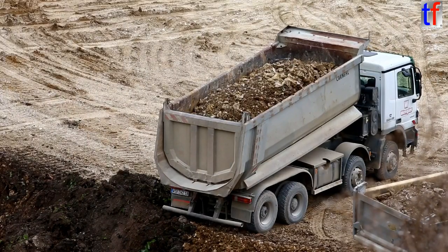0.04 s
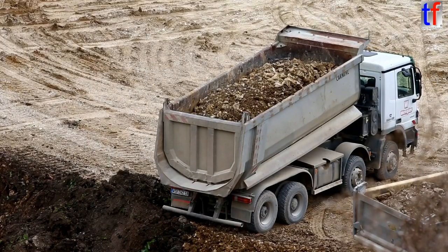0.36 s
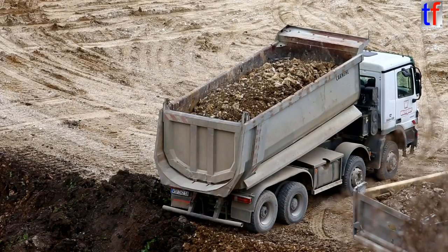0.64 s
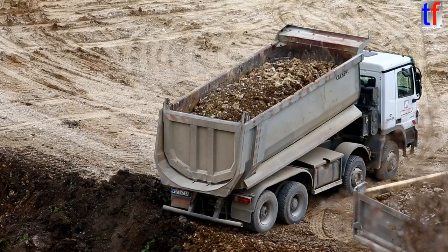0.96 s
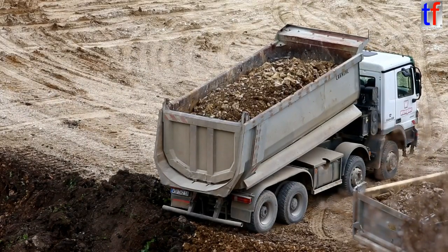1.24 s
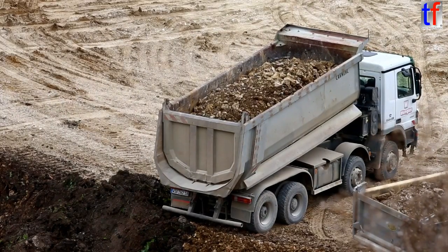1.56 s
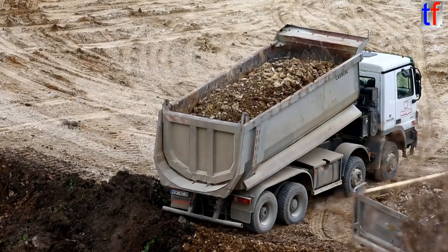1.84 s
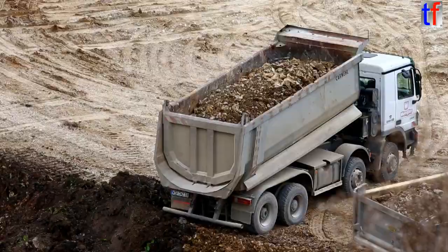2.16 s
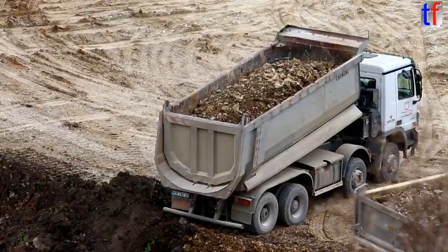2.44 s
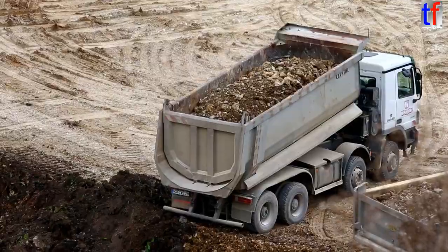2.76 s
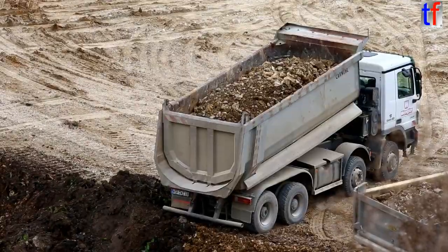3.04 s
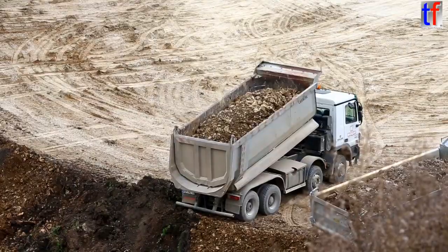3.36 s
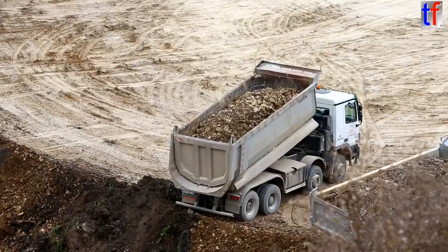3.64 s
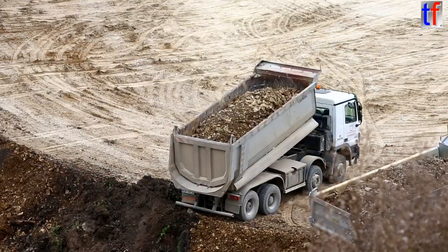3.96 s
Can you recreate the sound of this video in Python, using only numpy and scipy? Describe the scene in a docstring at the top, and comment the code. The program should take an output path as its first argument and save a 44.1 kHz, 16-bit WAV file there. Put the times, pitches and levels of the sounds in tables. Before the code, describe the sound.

A diesel dump truck idles in front of one microphone on a building site, distant machinery behind it. The sound cuts off briefly, then soil and stones scrape and clang loudly over steel, with hissing grit and an engine working underneath.

```python
"""A dump truck's six-cylinder diesel idles in front of one microphone on a building site, its
exhaust throbbing, while a second, slightly faster diesel knocks and machines hum further off.
After an abrupt break the site is much louder: stony soil grinds along a steel body, which
groans and rings as stones strike it. Fine grit hisses down, and an engine works behind it all."""
import sys
import numpy as np
from scipy.fft import rfft, irfft, next_fast_len
from scipy.io import wavfile
from scipy.ndimage import map_coordinates

SR = 44100
rng = np.random.default_rng(int(sys.argv[2]) if len(sys.argv) > 2 else 0)


def output_pcm(signal):
    """Save a mono or channel-first signal as 16-bit PCM at the path in sys.argv[1].

    Samples are clipped to [-1, 1] before scaling.
    """
    pcm = np.clip(np.atleast_2d(signal).T, -1, 1) * 32767
    wavfile.write(sys.argv[1], SR, np.round(pcm).astype(np.int16))


N = 176400
IDLE_END_S, WORK_START_S = 3.048, 3.126
CYCLE_HZ, CYLINDERS = 4.655, 6  # each of the truck's cylinders fires once a cycle


def amp(db):
    """Decibels to gain."""
    return 10 ** (np.asarray(db) / 20)

def unit(x):
    """Scale to rms 1."""
    return x / np.sqrt(np.mean(x ** 2) + 1e-20)

def clock():
    """Time of every sample in seconds."""
    return np.arange(N) / SR

def level(points):
    """Gain per sample from (s, dB) points."""
    return amp(np.interp(clock(), *np.transpose(points)))

def noise():
    """White noise."""
    return rng.standard_normal(N)

def wobble(rate):
    """A smooth random curve, rate knots a second."""
    return map_coordinates(rng.standard_normal(1024), [clock() * rate], mode="wrap")

def filtered(x, response):
    """x times a response of frequency."""
    size = next_fast_len(N + SR // 2)
    return irfft(rfft(x, size) * response(np.fft.rfftfreq(size, 1 / SR)), size)[:N]

def coloured(x, points):
    """x shaped by (Hz, dB) points, rms 1."""
    hz, db = np.transpose(points)
    return unit(filtered(x, lambda f: amp(np.interp(np.log(f + 1), np.log(hz + 1), db))))

def ringing(x, modes):
    """x through (Hz, width Hz, dB) resonances with steep skirts, rms 1."""
    band = lambda f, hz, width: 1j * f * width / (hz * hz - f * f + 1j * f * width)
    response = lambda f: sum(amp(db) * band(f, hz, w) * band(f, hz, 8 * w) for hz, w, db in modes)
    return unit(filtered(x, response))

def grains(rate, spread_db):
    """Random tiny impacts of uneven size, rate a second, rms 1."""
    hits = (rng.random(N) < rate / SR) * np.sign(noise())
    return unit(hits * amp(spread_db * np.minimum(rng.exponential(size=N), 4)))

def tones(rows, drift, flutter_db, rate):
    """Unsteady sines from (Hz, dB) rows; the phase wanders by drift radians."""
    out = np.zeros(N)
    for hz, db in rows:
        gain = np.sqrt(2) * amp(db + flutter_db * wobble(rate))
        out += gain * np.sin(2 * np.pi * (hz * clock() + rng.random()) + drift * wobble(rate))
    return out

def decay(start, t60, rise_s=.0004):
    """Envelope of a blow: a quick rise and an exponential fall."""
    age = np.maximum(clock() - start, 0)
    return np.minimum(age / rise_s, 1) * amp(np.maximum(-60 * age / t60, -200))

def idle_fade(db_per_s):
    """A slowly falling gain, 1 halfway through the idle."""
    return amp(-db_per_s * (clock() - IDLE_END_S / 2))


# The truck's exhaust tones. Each row: multiple of the engine cycle, level in dB.
EXHAUST_TONES = [(6, -65), (10, -56), (12, -42.5), (18, -63), (24, -66.5), (30, -59)]
# The rumble under them. Each row: frequency in Hz, relative level in dB.
IDLE_RUMBLE = [(8.8, -39), (15, -11), (38, -7), (60, -2.5), (77, -2), (146, -5), (237, -6), (276, -7.5),
               (322, -19.5), (420, -12.5), (550, -56), (920, -120)]

def exhaust():
    """Exhaust pulses make harmonics of the engine cycle over a low rumble."""
    harmonics = [(round(k) * CYCLE_HZ, db) for k, db in EXHAUST_TONES]
    pulses = tones(harmonics, drift=.1, flutter_db=.4, rate=7.4) * idle_fade(db_per_s=1)
    return pulses + amp(-46) * coloured(noise(), IDLE_RUMBLE)

# Noise off the engine block. Each row: frequency in Hz, relative level in dB.
BLOCK_SPECTRUM = [(180, -36), (300, -7), (340, -3), (520, -1), (726, -2.5), (940, -1.5), (1100, -3.5),
                  (1380, -5.5), (2200, -13), (2510, -12.5), (4330, -23.5), (5330, -25), (6900, -29.5),
                  (7800, -26.5), (8900, -26.5), (9800, -32), (11300, -34), (13300, -35), (13900, -48)]

def engine_block():
    """The block's noise throbs gently at the truck's firing rate."""
    throb = 1 + .046 * np.cos(2 * np.pi * CYLINDERS * CYCLE_HZ * clock())
    return amp(-42 + .29 * wobble(14)) * throb * coloured(noise(), BLOCK_SPECTRUM)

# The tick's ring. Each row: frequency in Hz, width in Hz, relative level in dB.
TICK_MODES = [(5300, 120, 0), (6100, 140, -6.5), (4020, 90, -9.5)]

def engine_tick(first_s=.015, decay_s=.0092):
    """A faint, bright tick once an engine cycle."""
    age = (clock() - first_s) % (1 / CYCLE_HZ)
    gain = amp(-71.5 + .8 * wobble(3.83)) * idle_fade(db_per_s=2.5)
    return gain * ringing(noise() * np.exp(-age / decay_s), TICK_MODES)

# The second diesel's repeating accents. Each entry: one blow's relative level in dB.
KNOCK_ACCENTS = [1, -1.5, 1]
# Its knock's colour. Each row: frequency in Hz, relative level in dB.
KNOCK_SPECTRUM = [(300, -23), (600, -3), (1150, 3), (1800, -9.5), (2550, -5.5), (3500, -8.5), (5000, -20),
                  (9000, -29), (14000, -37)]
# Chattering metal. Each row: frequency in Hz, width in Hz, relative level in dB.
CHATTER_MODES = [(2465, 41, 1), (2654, 51, -5.5)]

def second_diesel(firing_hz=29.76, decay_s=.0068):
    """A slightly faster diesel knocks unevenly, with a thin metallic chatter that comes and goes."""
    firing, fraction = np.divmod(clock() * firing_hz, 1)
    firing = firing.astype(int)
    size = amp(np.take(KNOCK_ACCENTS, firing, mode="wrap") + 2 * rng.standard_normal(256)[firing])
    blows = noise() * size * np.exp(-fraction / firing_hz / decay_s)
    chatter = amp(-63.5 + 3.2 * wobble(12)) * ringing(blows, CHATTER_MODES)
    return amp(-55) * coloured(blows, KNOCK_SPECTRUM) + chatter

# Scrape, panel boom and panel clang at the microphone. Each row: time in seconds, level in dB.
SCRAPE_LEVEL = [(3.126, -29), (3.19, -24), (3.25, -30), (3.288, -29), (3.305, -20), (3.335, -17.5),
                (3.378, -18.5), (3.41, -23.5), (3.46, -28.5), (3.53, -32), (3.7, -35), (3.78, -35),
                (3.9, -33), (3.945, -30.5), (3.958, -23.5), (4.0, -26.5)]
BOOM_LEVEL = [(3.126, -46), (3.18, -33), (3.25, -33), (3.32, -38.5), (3.375, -32.5), (3.45, -32),
              (3.53, -43.5), (3.74, -58), (3.765, -35.5), (3.82, -32), (3.9, -45), (3.96, -38.5),
              (4.0, -40)]
CLANG_LEVEL = [(3.126, -40), (3.18, -28), (3.285, -35), (3.375, -21), (3.44, -29), (3.53, -31.5),
               (3.68, -41), (3.752, -58), (3.762, -32.5), (3.85, -31.5), (3.925, -43), (3.96, -28),
               (4.0, -30.5)]
# Soil scraping steel. Each row: frequency in Hz, relative level in dB.
SCRAPE_SPECTRUM = [(300, -39), (700, -18), (1250, 1), (1600, -3.5), (2100, 0), (2500, 1), (3300, 1),
                   (4000, -5.5), (4700, -3.5), (5400, -8.5), (6000, -15), (9000, -19), (11500, -52),
                   (14000, -70)]
# The steel body's resonances. Each row: frequency in Hz, width in Hz, relative level in dB.
SCRAPE_MODES = [(2370, 20, 3), (2590, 23, -1), (2805, 41, -1), (3075, 30, -10), (3320, 17, -1),
                (3620, 30, -4)]
BOOM_MODES = [(384, 14, -6), (438, 19, -6.5), (457.1, 10, -2), (540, 15, -8.5)]
CLANG_MODES = [(821, 22, -10), (879, 24, -1), (933, 41, -4), (1082, 24, -4), (1118, 26, -4.5),
               (1175, 26, -3), (1262, 31, -7), (1438, 60, -12.5)]

def grinding_soil():
    """Dense stone contacts scrape the steel and set its panels ringing."""
    contacts = grains(rate=4500, spread_db=2.8) + .5 * noise()
    scrape = unit(coloured(contacts, SCRAPE_SPECTRUM) + amp(-12.5) * ringing(contacts, SCRAPE_MODES))
    boom = level(BOOM_LEVEL) * ringing(contacts, BOOM_MODES)
    clang = level(CLANG_LEVEL) * ringing(contacts, CLANG_MODES)
    return level(SCRAPE_LEVEL) * scrape + boom + clang

# The body's groans. Each row: start and end in seconds, first and last pitch in Hz, gain in dB.
GROANS = [(3.14, 3.31, 385, 386, -30.5), (3.135, 3.29, 462, 456, -30.5), (3.335, 3.51, 458, 436, -28.5)]

def steel_groans(attack_s=.033):
    """The dragging load sticks and slips: wavering tones swell and fade, each with its octave."""
    t, out = clock(), np.zeros(N)
    for start, end, first_hz, last_hz, db in GROANS:
        pitch = np.interp(t, [start, end], [first_hz, last_hz])
        phase = 2 * np.pi * np.cumsum(pitch) / SR + .24 * wobble(60)
        swell = np.clip((t - start) / attack_s, 0, 1)
        fade = np.sqrt(np.clip((end - t) / (end - start), 0, 1))
        gain = np.sqrt(2) * amp(db + 1.9 * wobble(50)) * swell * fade
        out += gain * (np.sin(phase) + amp(-8) * np.sin(2 * phase + wobble(80)))
    return out

# Stones on the body. Each row: start in seconds, ring level in dB, seconds to fall 60 dB.
STONE_STRIKES = [(3.131, -32, .03), (3.383, -16, 0.078), (3.391, -18, 0.14), (3.484, -28, 0.2),
                 (3.59, -28, 0.11), (3.825, -36, 0.075), (3.918, -31, 0.17), (3.934, -31, 0.1),
                 (3.955, -29, 0.24), (3.988, -29, 0.098)]
# The struck steel. Each row: frequency in Hz, width in Hz, relative level in dB.
STONE_MODES = [(4285, 25, -1), (4494, 28, 1), (4605, 30, 1), (4789, 45, -5), (5240, 140, -13)]
# A stone's rasp. Each row: frequency in Hz, relative level in dB.
STONE_RASP = [(1500, -25), (3000, -4), (4000, -5), (4500, -1), (5200, -11), (6200, -22), (9000, -35),
              (12000, -70)]

def stones():
    """Hard stones ring the steel and rasp over it."""
    out = np.zeros(N)
    for start, db, t60 in STONE_STRIKES:
        ring = ringing(noise(), STONE_MODES)
        rasp = amp(-6.5) * coloured(noise(), STONE_RASP)
        out += amp(db) * decay(start, t60) * (ring + rasp)
    return out

# Clods landing. Each row: start in seconds, level in dB, centre frequency in Hz.
CLOD_KNOCKS = [(3.1312, -16, 3000), (3.258, -20, 2300), (3.3025, -19, 2800), (3.359, -17, 1400),
               (3.678, -24.5, 1730), (3.757, -22, 650), (3.828, -21, 1200), (3.955, -24, 2500)]
# A clod's colour. Each row: multiple of the centre frequency, relative level in dB.
CLOD_SPECTRUM = [(.1, -25), (.5, -8), (1, 0), (1.5, -7), (2.5, -20), (4, -60)]

def clods():
    """Clods and rocks knock dully, without ringing."""
    out = np.zeros(N)
    for start, db, centre_hz in CLOD_KNOCKS:
        spectrum = [(k * centre_hz, band_db) for k, band_db in CLOD_SPECTRUM]
        out += amp(db) * decay(start, t60=.03) * coloured(noise(), spectrum)
    return out

# Falling grit. Each row: frequency in Hz, relative level in dB.
GRIT_SPECTRUM = [(2000, -24), (5000, 1), (6800, -3), (8200, 2), (9200, -3.5), (10000, -8), (11000, -18.5),
                 (12000, -28), (14000, -38)]

def grit(fade_db_per_s=11, dulling_db_per_s=4, split_hz=9600):
    """Fine grit hisses down and fades; its finest part dies out sooner."""
    age = np.maximum(clock() - WORK_START_S, 0)
    hiss = coloured(grains(rate=4500, spread_db=3) + .5 * noise(), GRIT_SPECTRUM)
    coarse = filtered(hiss, lambda hz: 1 / (1 + (hz / split_hz) ** 20))
    fine = amp(-dulling_db_per_s * age) * (hiss - coarse)
    return amp(-33 - fade_db_per_s * age + .6 * wobble(60)) * (coarse + fine)

# The engine behind the soil. Each row: frequency in Hz, level in dB.
WORK_TONES = [(52, -49.5), (72, -46), (94, -47), (115, -56), (160, -55)]
# Its rumble. Each row: frequency in Hz, relative level in dB.
LOADED_RUMBLE = [(20, -23), (60, -8), (120, -1), (240, -0.5), (300, -4.5), (520, 0), (720, -1),
                 (1500, 0), (4000, -38.5)]

def working_engine():
    """A diesel under load, heard as low tones in a rumble."""
    drone = tones(WORK_TONES, drift=.35, flutter_db=5, rate=14)
    return drone + amp(-32) * coloured(noise(), LOADED_RUMBLE)

# Snaps over the idle. Each row: start in seconds, level in dB, low and high band edge in Hz.
SNAPS = [(1.778, -33.5, 4600, 8000), (2.808, -35, 6870, 10340)]

def snaps():
    """Two small bright clicks."""
    out = np.zeros(N)
    for start, db, low, high in SNAPS:
        band = [(low / 2, -40), (low * .93, -22), (low, 0),
                (high, -5), (high * 1.07, -18), (high * 1.5, -35)]
        out += amp(db) * decay(start, t60=.014) * coloured(noise(), band)
    return out

# Machines and gears further off. Each row: frequency in Hz, level in dB.
MACHINE_HUM = [(94, -56.5), (110.5, -57), (118, -62), (180.5, -58.5), (282.5, -59), (343, -66.5),
               (382, -66), (538, -59.5), (565, -64.5)]
GEAR_WHINE = [(1077, -53.5), (1141, -57.5), (1225, -61.5)]

def distant_machines():
    """Wavering hum and gear whine from around the site."""
    hum = tones(MACHINE_HUM, drift=.41, flutter_db=3, rate=4.01)
    return hum + tones(GEAR_WHINE, drift=1, flutter_db=3, rate=25)

def scene():
    """The idle, a short break, then the loud work, all over a very faint low rumble."""
    t = clock()
    idle = exhaust() + engine_block() + second_diesel() + engine_tick() + distant_machines() + snaps()
    work = working_engine() + grinding_soil() + steel_groans() + stones() + clods() + grit()
    floor = amp(-79) * coloured(noise(), [(20, 19), (60, -23), (300, -35), (3000, -60)])
    return (idle * (t < IDLE_END_S) + work * (t >= WORK_START_S) + floor)[None]

def record(dry, top_hz=13900):
    """One microphone channel, cut off steeply above top_hz."""
    return filtered(dry[0], lambda hz: 1 / (1 + (hz / top_hz) ** 120))[None]


dry = scene()
out = record(dry)
output_pcm(out)
```